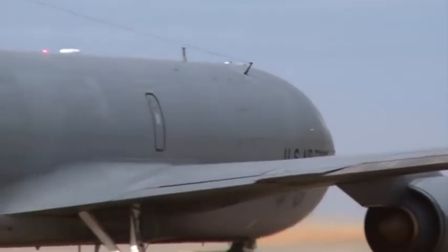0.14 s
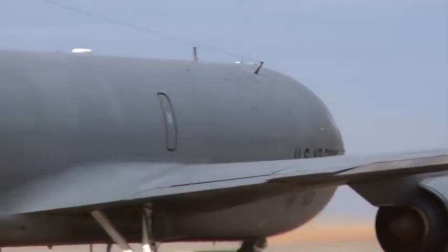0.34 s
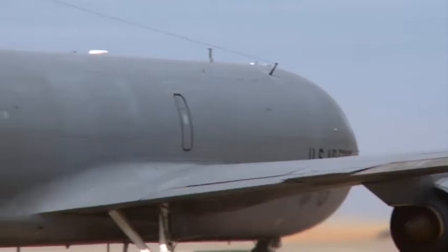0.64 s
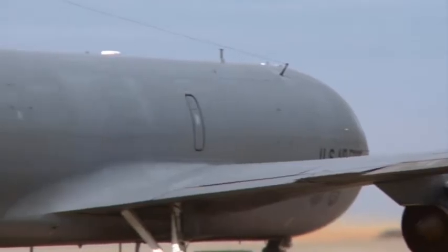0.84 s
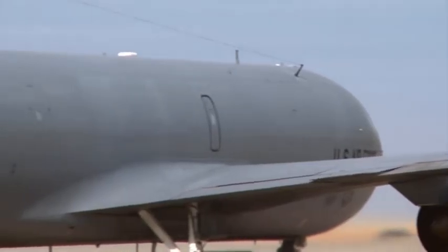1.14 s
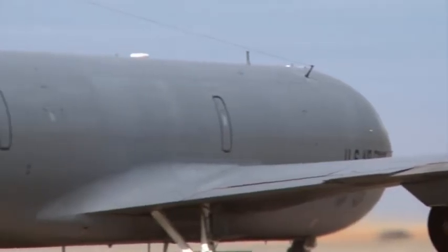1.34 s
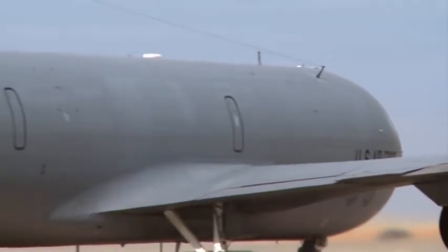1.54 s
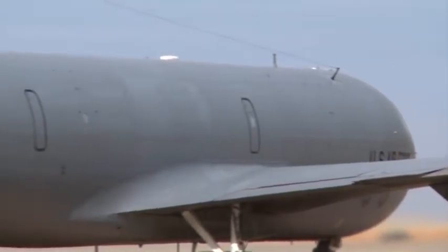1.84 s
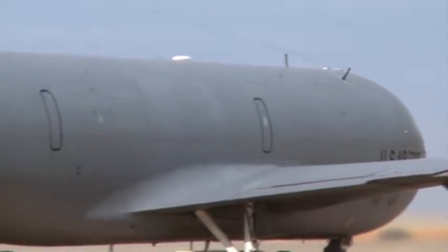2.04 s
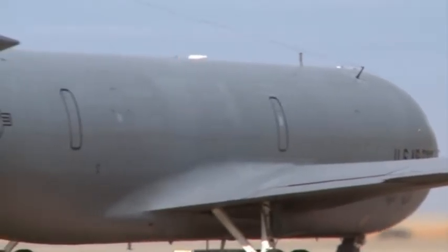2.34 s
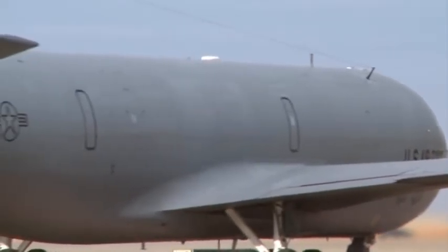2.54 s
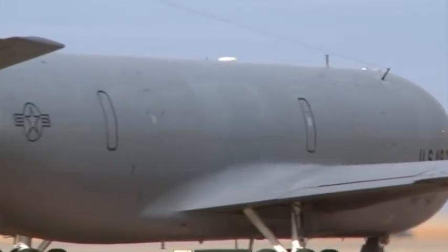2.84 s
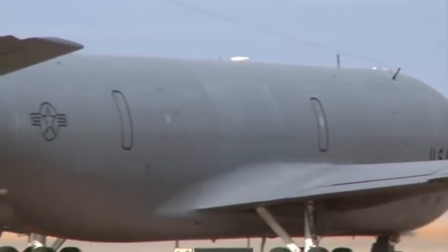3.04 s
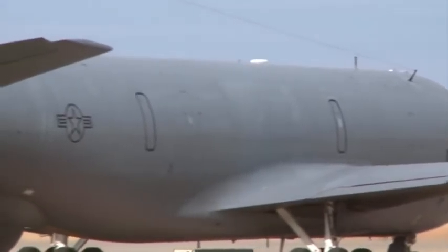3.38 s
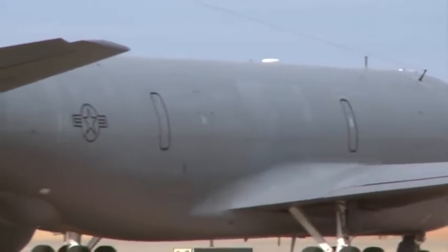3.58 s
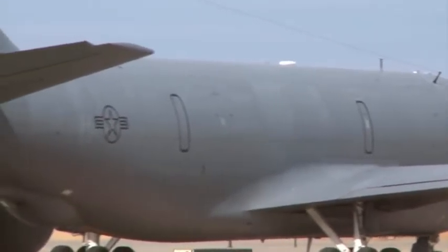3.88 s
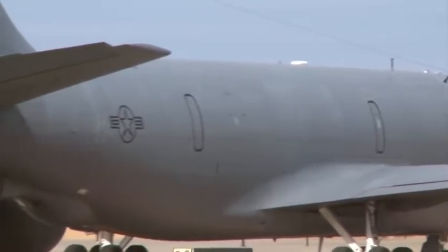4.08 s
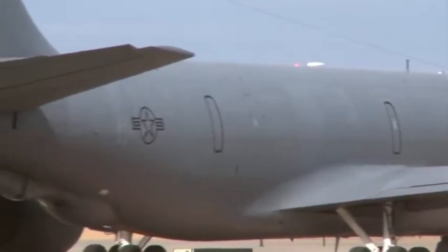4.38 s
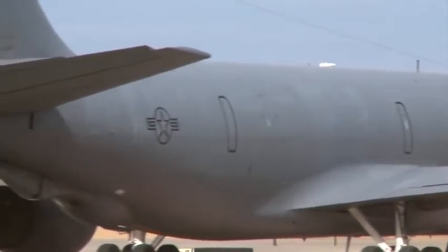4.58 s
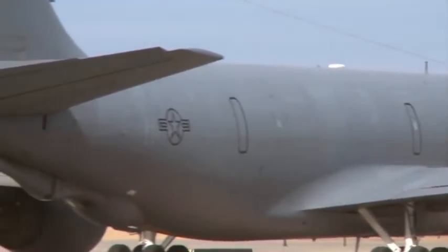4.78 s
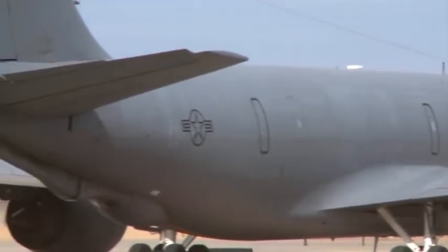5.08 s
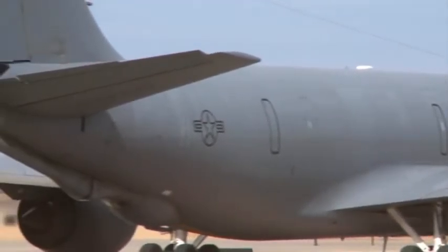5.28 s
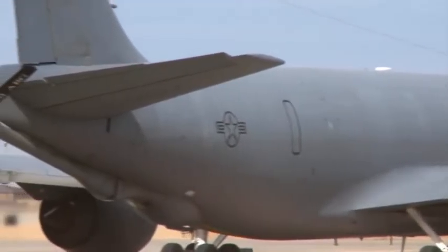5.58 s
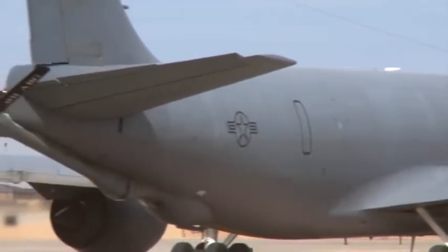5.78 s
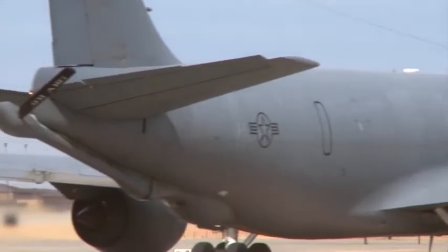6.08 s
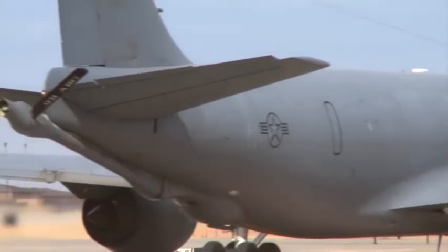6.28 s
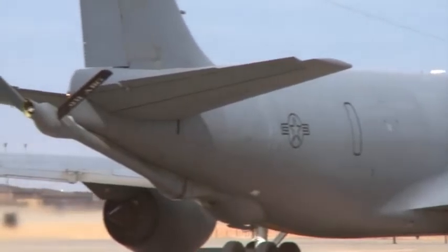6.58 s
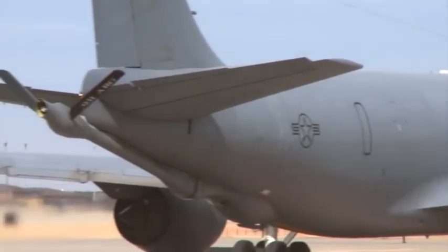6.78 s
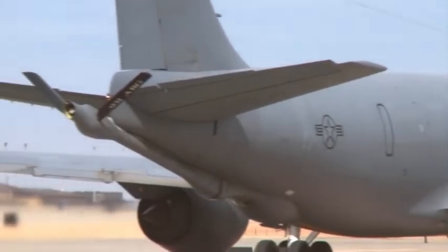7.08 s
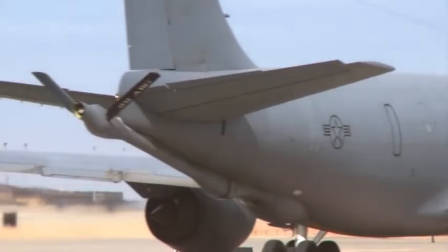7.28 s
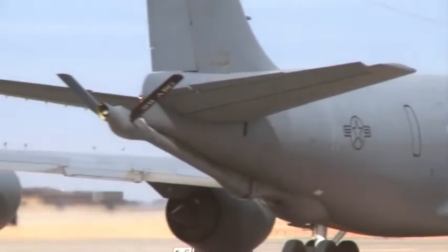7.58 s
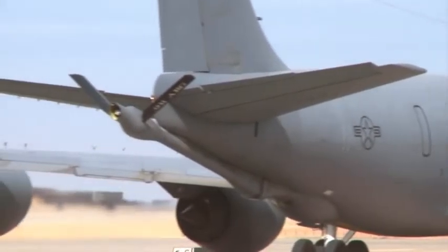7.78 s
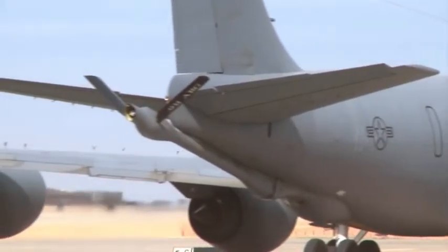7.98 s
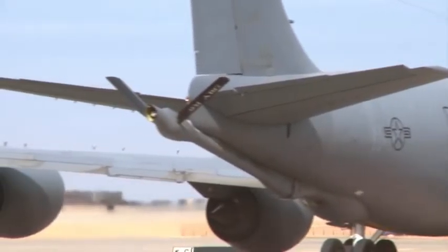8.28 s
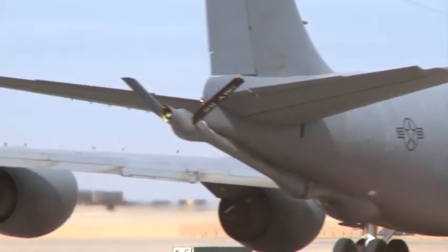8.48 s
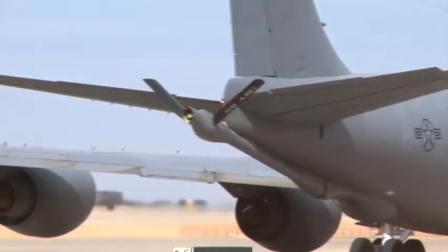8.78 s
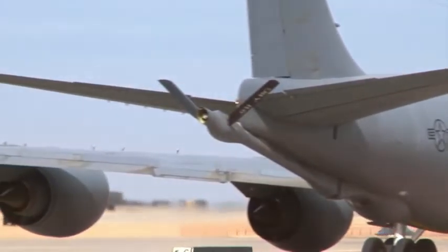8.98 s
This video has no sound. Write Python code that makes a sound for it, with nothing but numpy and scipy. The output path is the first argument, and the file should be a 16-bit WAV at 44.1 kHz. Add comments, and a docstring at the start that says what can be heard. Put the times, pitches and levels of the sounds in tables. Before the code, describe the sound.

On an open airfield, a large four-engined jet taxis past. Loud exhaust rumble, roar and fan hiss dominate the first two seconds, with a wavering hum, faint high whine and soft low wind thumps on the microphone. The engines then fade unevenly, the hum sinks away, and a quieter, gusty rumble and hiss remain, the exhaust returning slightly late on.

```python
"""A four-engined jet tanker taxis past on an open airfield and turns its tail to the microphone.
For the first two seconds it is loudest: exhaust noise rumbles and roars, fan noise hisses and drones,
wind buffets thump on the microphone, and turbine tones whine above. The exhausts and fans then fade,
each at its own pace; the drone sinks, the whine glides, and the exhausts return a little near the end.
Noises are coloured spectra with moving levels; tones are carriers scattered by random modulation."""
import sys
import numpy as np
from scipy import signal
from scipy.fft import rfft, irfft
from scipy.io import wavfile
from scipy.ndimage import uniform_filter1d

SR = 44100
rng = np.random.default_rng(int(sys.argv[2]) if len(sys.argv) > 2 else 0)


def transcribe(u):
    """Save the signal u as a 16-bit wav file named by the first command-line argument.

    u: samples, shape (n,) or (channels, n), limited to [-1, 1]; the rate is SR.
    q: integer samples, one column per channel.
    """
    v = np.clip(np.atleast_2d(u).T, -1, 1)
    q = np.round(v * 32767).astype(np.int16)
    wavfile.write(sys.argv[1], SR, q)


N = 402633
T = np.arange(N) / SR  # time in s
HZ = np.maximum(np.fft.rfftfreq(N, 1 / SR), 1)  # frequency of each spectral bin

# Fan noise towards the microphone. Each row: time in seconds, hiss level in dB.
FAN_LEVELS = [(0, -35.5), (.3, -37.5), (1.2, -38.3), (1.9, -43.5), (2.6, -44), (3.3, -46), (4.6, -48),
              (5.6, -49.5), (7.4, -47.5), (8.3, -51), (9.13, -49.5)]
# Gusts and lulls on the microphone. Each row: centre in seconds, standard deviation in seconds, rise in dB.
GUST_EVENTS = [(.72, 0.11, 2.5), (1.5, 0.1, 6.5), (2.02, .1, 3.5), (2.68, 0.11, 5.5), (3.75, 0.23, 2.5),
               (4.95, 0.24, -4), (5.7, 0.13, 0.5), (6.5, .17, -2.5), (6.9, 0.099, 2), (7.77, 0.2, 4.5),
               (8.95, 0.21, 5.5)]
# Deep spectrum shared by wind and exhaust. Each row: frequency in Hz, relative density in dB per Hz.
DEEP_SPECTRUM = [(10, -8), (20, -1), (45, -1.5), (70, -1.5), (98, 0), (125, -12), (180, -25), (400, -65)]
DEEP_SPLIT_HZ, DEEP_SPLIT_ORDER = 62.0, 8  # wind below, exhaust above


def undb(db):
    """Logarithmic level: decibels become an amplitude ratio."""
    return 10 ** (np.asarray(db) / 20)


def curves(table):
    """Interpolation: the columns of a table as curves in time, smoothed over 0.1 s."""
    s, *columns = np.transpose(table)
    return [uniform_filter1d(np.interp(T, s, c), SR // 10) for c in columns]


def bells(table):
    """Gaussian envelopes: events rise and fall smoothly, summed in dB for each level column."""
    rows = np.array(table)
    centre_s, spread_s = rows[:, :1], rows[:, 1:2]
    return rows[:, 2:].T @ np.exp(-.5 * ((T - centre_s) / spread_s) ** 2)


def colour(points):
    """Spectral shaping: gain at every frequency, interpolated in dB over log frequency."""
    hz, db = np.transpose(points)
    return undb(np.interp(np.log(HZ), np.log(hz), db, left=-120, right=-120))


def noise(gain, low_hz, high_hz):
    """Filtered white noise: a spectrum whose rms between the two frequencies is about 1."""
    power = np.sum(gain[(HZ > low_hz) & (HZ < high_hz)] ** 2) * 2 / N
    return rfft(rng.standard_normal(N)) * gain / np.sqrt(power)


def below(hz, order=6):
    """Crossover: the share of each frequency that lies under a soft edge."""
    return 1 / (1 + (HZ / hz) ** order)


def walk(rate):
    """Low-passed random process: a smooth wander with a spread near 1; rate in steps per second."""
    k = max(int(SR / rate), 1)
    steps = np.repeat(rng.standard_normal(N // k + 1), k)
    return 1.24 * uniform_filter1d(uniform_filter1d(steps, k), k)[:N]


def scattered_tone(hz, width_hz):
    """Spectral broadening: turbulence scrambles a tone's strength and phase into a narrow hump, rms 1."""
    phase = 2 * np.pi * np.cumsum(hz * np.ones(N)) / SR
    tone = walk(2 * width_hz) * np.cos(phase) + walk(2.3 * width_hz) * np.sin(phase)
    return tone / np.std(tone)


def beamed(far_db, slope):
    """Directivity: each part of the exhaust noise follows the turning aircraft at its own rate."""
    # The exhausts fade, then return a little as the tail comes round.
    # Each row: time in seconds, level in dB.
    exhaust_levels = [(0, -30.5), (.4, -32), (1.45, -34), (2.2, -40), (3, -43.5), (4.4, -45), (5.3, -47.5),
                      (6.7, -44.5), (7.7, -45), (9.13, -45)]
    reference_db = -45  # exhaust level at which a part has its far_db
    return far_db + slope * (curves(exhaust_levels)[0] - reference_db)


def shimmer(x, count=20):
    """Propagation through moving air: neighbouring patches of the spectrum fade and flare independently."""
    depth_db, rate_hz, spacing_octaves = 0.6, 6, 0.1984
    spectrum, octaves, out = rfft(x), np.log2(HZ / 280), x
    for k in range(count):
        patch = np.maximum(1 - np.abs(octaves / spacing_octaves - k), 0)
        change = undb(depth_db * walk(rate_hz)) - 1
        out = out + irfft(spectrum * patch, N) * change
    return out


def wind():
    """Turbulent pressure on the microphone: deep noise that dies down and swells with the gusts."""
    final_db, fall_db, half_fall_s = -37.5, 10.5, 2.17  # half of the fall in dB is over at half_fall_s
    (gust_db,) = bells(GUST_EVENTS)
    breeze_db = final_db + fall_db / (1 + (T / half_fall_s) ** 4)
    wind_db = breeze_db + gust_db + 1.24 * walk(10)
    gain = colour(DEEP_SPECTRUM) * np.sqrt(below(DEEP_SPLIT_HZ, DEEP_SPLIT_ORDER))
    return irfft(noise(gain, 20, 62), N) * undb(wind_db)


def buffets():
    """Eddy impact: each eddy that hits the microphone sucks, then pushes, as one soft low thump."""
    # Each row: centre in seconds, peak level in dB, pitch in Hz.
    thumps = [(0.278, -12.5, 82.6), (0.629, -13, 40), (0.695, -5.5, 63), (.857, -16, 45), (1.502, -8, 64),
              (1.866, -19, 70), (2.0, -16.5, 44.6)]
    out = np.zeros(N)
    for s, db, hz in thumps:
        turn = 2 * np.pi * hz * (T - s)
        out += undb(db) * turn * np.exp((1 - turn ** 2) / 2)
    return out


def whine():
    """Turbine tones at slightly different speeds: two glide as the aircraft turns, the third is steady."""
    # Nearest turbine. Each row: time in seconds, pitch in Hz, level in dB.
    nearest = [(0, 11080, -64), (.8, 11300, -68.5), (1.7, 11650, -73), (2.6, 11680, -77), (4.2, 11100, -74),
               (5.3, 10780, -74.5), (6.1, 10830, -71.5), (7.2, 10850, -71.5), (9.13, 11000, -74)]
    first_hz, first_db = curves(nearest)
    # the second drifts towards the first by 60 Hz per second and fades by 2 dB per second
    turbines = [(first_hz, first_db),
                (first_hz + 780 - 60 * T, -70 - 2 * T),
                (10170, first_db - 4)]
    out = 0
    for hz, db in turbines:
        # the exhaust scatters each tone into a flickering hump with a broad skirt
        hump, skirt = scattered_tone(hz, width_hz=260), scattered_tone(hz, width_hz=640)
        flicker_db = 1.5 * walk(50)
        out = out + (undb(-5.5) * hump + undb(-1.7) * skirt) * undb(db + flicker_db)
    return out


def drone():
    """Tonal fan noise: one wavering hum sinks as it fades."""
    # Each row: time in seconds, pitch in Hz, level in dB.
    hum_track = [(0, 421, -42), (.55, 416, -43), (1.2, 416.6, -48), (1.8, 416, -54), (2.8, 412, -53.5),
                 (3.5, 403, -53), (4.3, 384, -54), (5, 379.6, -60), (9.13, 381, -75)]
    hz, db = curves(hum_track)
    return scattered_tone(hz, width_hz=4) * undb(db)


def sweeping_lobes():
    """Directivity lobes: engine tones and resonances swell while their lobes point at the microphone."""
    # Each row: centre in seconds, standard deviation in seconds, pitch in Hz, width in Hz, peak level in dB.
    lobe_tones = [(0, 0.11, 958, 220, -30.5), (0, 0.22, 2275, 116, -43), (0.096, 0.29, 671, 70, -37.5),
                  (.1, 0.18, 428, 8.3, -40.5), (1.15, 0.19, 431, 8, -39.5), (1.2, 0.75, 2200, 136, -46.5),
                  (1.45, 0.4, 225.4, 44.5, -38.5), (1.45, .2, 1126, 126, -46), (2.35, .3, 530, 85, -51),
                  (3.499, 0.44, 330.6, 35, -53), (4, .6, 1030, 90, -53), (5.1, 0.21, 1856, 250, -51),
                  (6.1, 0.6, 314.2, 55, -51), (7.1, 0.38, 641, 79, -51), (7.3, 0.65, 1772, 205, -53),
                  (7.953, 0.47, 142, 24.3, -41), (9, 0.42, 790, 255, -45), (9.1, 0.52, 1860, 170, -50.5)]
    out = np.zeros(N)
    for s, spread_s, hz, width_hz, peak_db in lobe_tones:
        envelope = np.exp(-.5 * ((T - s) / spread_s) ** 2)
        out += scattered_tone(hz, width_hz) * undb(peak_db) * envelope
    return out


def fan_hiss(treble_db):
    """Broadband blade noise: moving air makes all of it flutter together."""
    # Each row: frequency in Hz, relative density in dB per Hz.
    hiss_spectrum = [(1300, -33), (1850, -5), (2230, 1), (2650, -4), (3000, -12.5), (3400, -14),
                     (4200, -27), (4800, -30), (5400, -26), (6400, -27.5), (7200, -32), (10200, -33),
                     (12700, -37), (15500, -37.5)]
    # Resonance-shaped humps. Each row: centre in Hz, full width at half the rise in Hz, rise in dB.
    blade_humps = [(3230, 370, 1.5), (4450, 260, 3), (6200, 230, 3.5), (8300, 380, 0.5), (13950, 700, 4)]
    (fan_db,) = curves(FAN_LEVELS)
    humps_db = sum(rise / (1 + (2 * (HZ - hz) / width) ** 2) for hz, width, rise in blade_humps)
    hiss = noise(colour(hiss_spectrum) * undb(humps_db), 1900, 3600)
    flutter_db = .4 * walk(25) + .6 * walk(110)
    return irfft(hiss, N) * undb(fan_db + treble_db + flutter_db)


def core_boom(bass_db):
    """Combustion noise: a low boom of the combustors that swells with the bass."""
    # Each row: frequency in Hz, relative density in dB per Hz.
    core_spectrum = [(70, -20.5), (105, -3), (130, 1.5), (160, -3), (200, -11.5), (300, -46)]
    core_db = beamed(far_db=-39.5, slope=0.53) + bass_db + 1.1 * walk(9)
    return irfft(noise(colour(core_spectrum), 110, 190), N) * undb(core_db)


def exhaust_rumble():
    """Low-frequency jet noise: a rumble above the wind that takes a small share of each gust's rise."""
    gust_share = 0.18
    (gust_db,) = bells(GUST_EVENTS)
    exhaust_db = beamed(far_db=-38.5, slope=0.89) + gust_share * gust_db + 0.77 * walk(9)
    gain = colour(DEEP_SPECTRUM) * np.sqrt(1 - below(DEEP_SPLIT_HZ, DEEP_SPLIT_ORDER))
    return irfft(noise(gain, 62, 115), N) * undb(exhaust_db)


def roar(bass_db, treble_db):
    """Jet mixing noise: large eddies sound low, fine ones high, and each size is beamed its own way."""
    # Each row: frequency in Hz, relative density in dB per Hz.
    jet_spectrum = [(120, -6), (200, 5), (340, 2.5), (450, -0.5), (540, -1.5), (680, 1.5), (860, -0.5),
                    (1040, -3), (1180, -7), (1450, -5.5), (1750, -9), (2100, -15), (3500, -40)]
    fan_share = 0.23  # fine eddies are beamed partly like the fans
    (fan_db,) = curves(FAN_LEVELS)
    large_db = beamed(far_db=-45, slope=0.76) + bass_db
    middle_db = beamed(far_db=-48, slope=0.82) + 0.61 * bass_db + 1.08 * treble_db
    fine_db = beamed(far_db=-51.5, slope=1 - fan_share) + treble_db
    fine_db = fine_db + fan_share * (fan_db - np.median(fan_db))
    jet = colour(jet_spectrum)
    low, high = below(546), 1 - below(1094)
    eddies = [(low, (200, 550), large_db),
              (1 - low - high, (550, 1050), middle_db),
              (high, (1050, 1800), fine_db)]
    out = np.zeros(N)
    for share, band_hz, db in eddies:
        eddy_noise = irfft(noise(jet * np.sqrt(np.abs(share)), *band_hz), N)
        out += eddy_noise * undb(db + 0.77 * walk(20))
    return out


def scene():
    """Superposition at one microphone: the same moving air swells the exhausts and the fans."""
    # Each row: centre in seconds, standard deviation in seconds, bass rise in dB, treble rise in dB.
    air_swells = [(.67, 0.061, 1.5, 1), (1.35, 0.042, 1, 2.5), (3.75, 0.099, 0, 1.3), (5.04, 0.13, -4, 3),
                  (5.48, 0.086, -3.5, 0), (7.05, 0.13, 1.1, 2), (8.35, 0.24, -3.5, 0.8), (9, 0.17, -1, 3.5)]
    bass_db, treble_db = bells(air_swells)
    on_microphone = wind() + buffets()
    tones = whine() + drone() + sweeping_lobes()
    low_exhaust = core_boom(bass_db) + exhaust_rumble()
    through_air = shimmer(fan_hiss(treble_db) + roar(bass_db, treble_db))
    return (on_microphone + tones + low_exhaust + through_air)[None]


def record(dry):
    """Elliptic low-pass filtering: the camera cuts the treble steeply above 15.4 kHz."""
    sos = signal.ellip(10, .1, 80, 15400, fs=SR, output="sos")  # order, ripple dB, rejection dB, edge Hz
    return signal.sosfilt(sos, dry)


dry = scene()
out = record(dry)
transcribe(out)
```